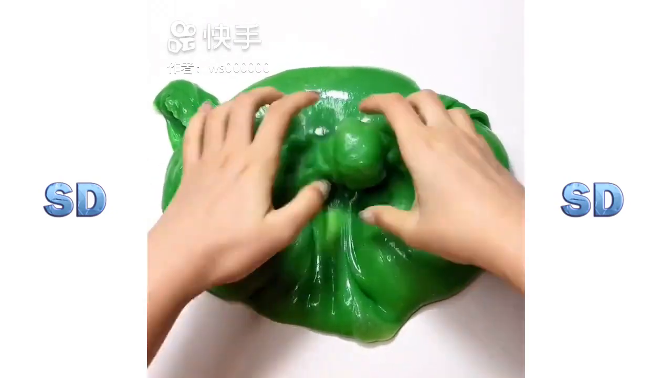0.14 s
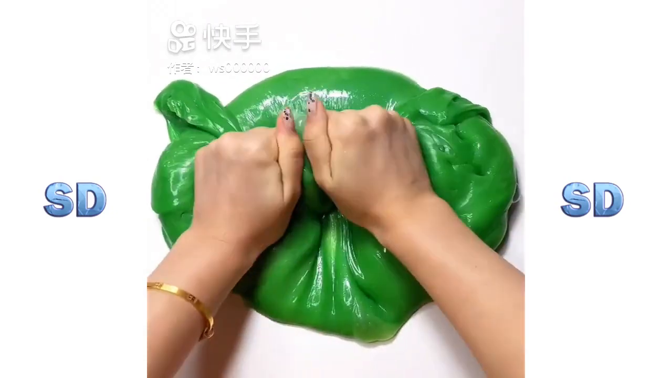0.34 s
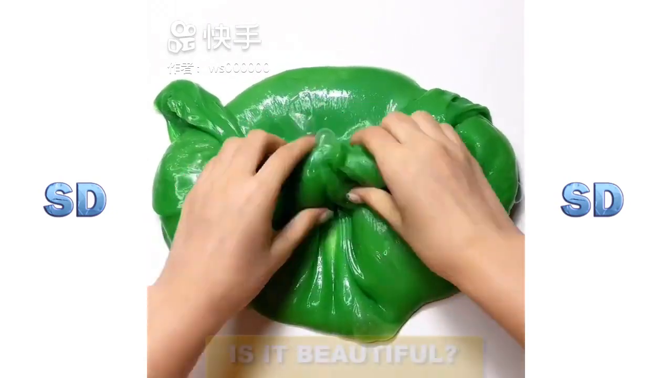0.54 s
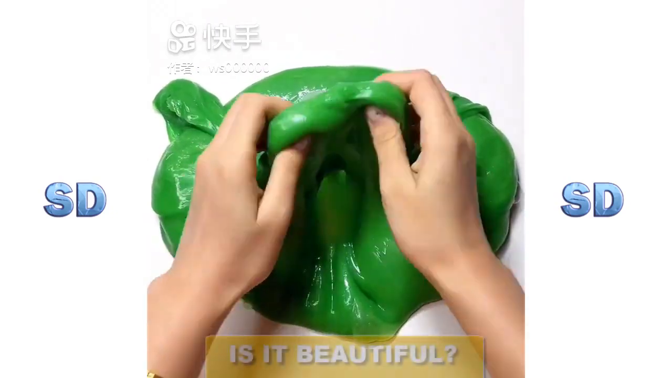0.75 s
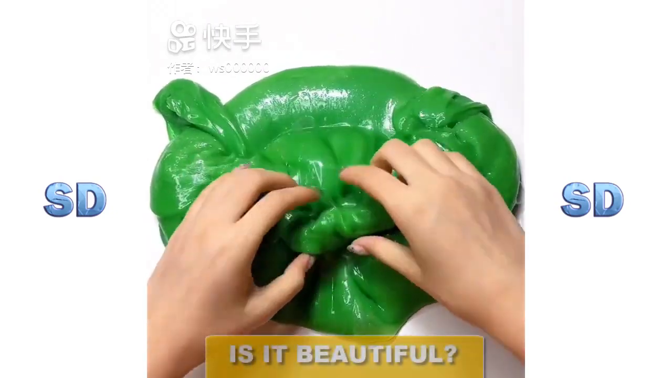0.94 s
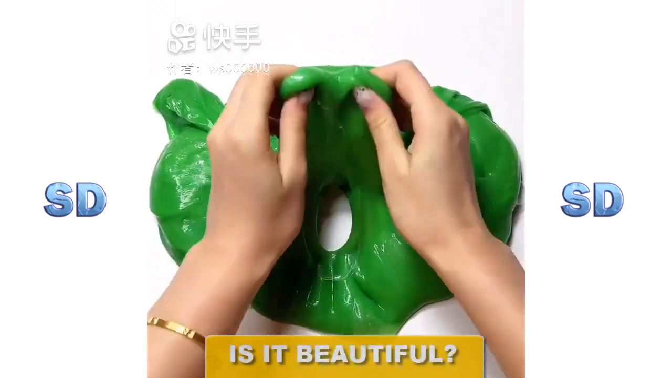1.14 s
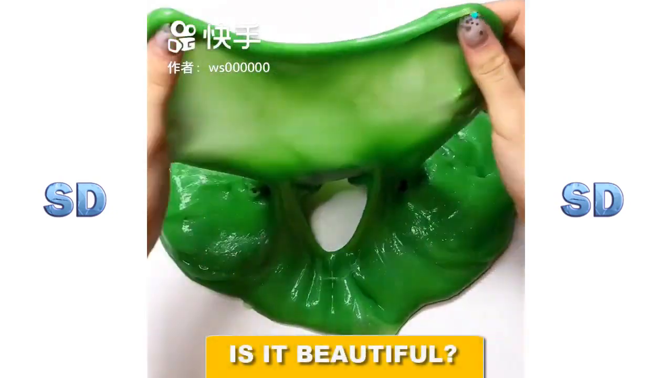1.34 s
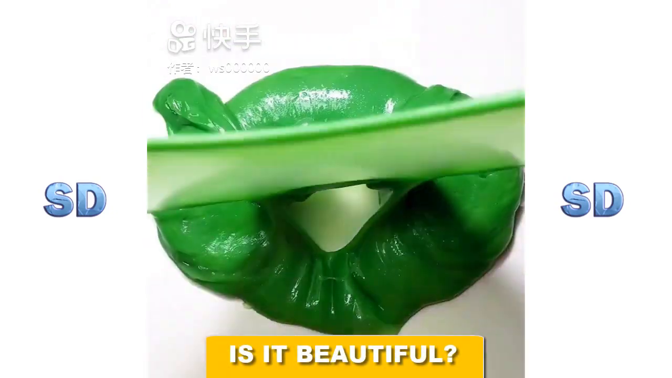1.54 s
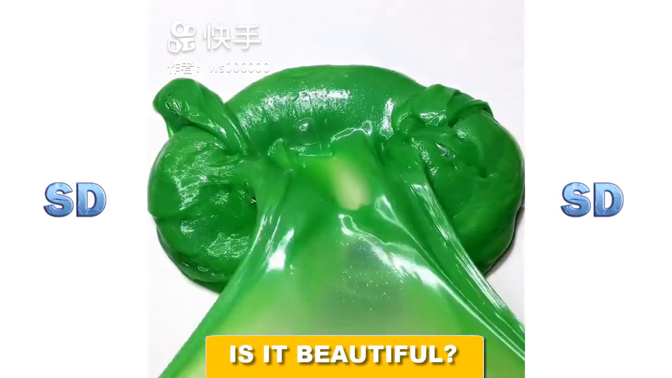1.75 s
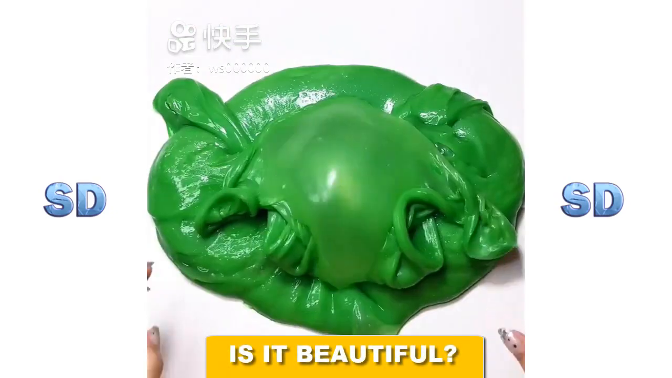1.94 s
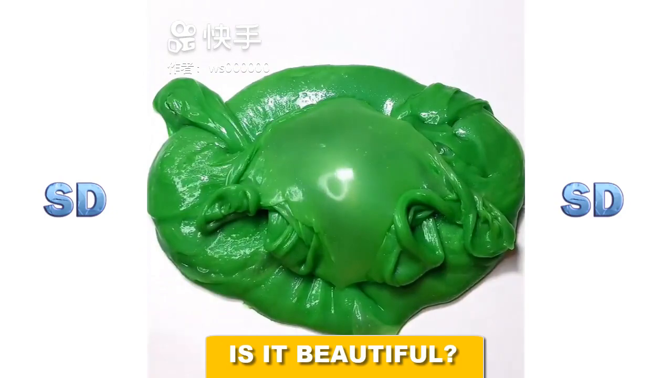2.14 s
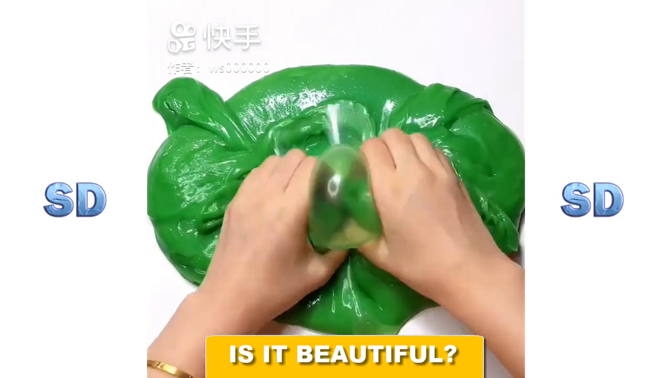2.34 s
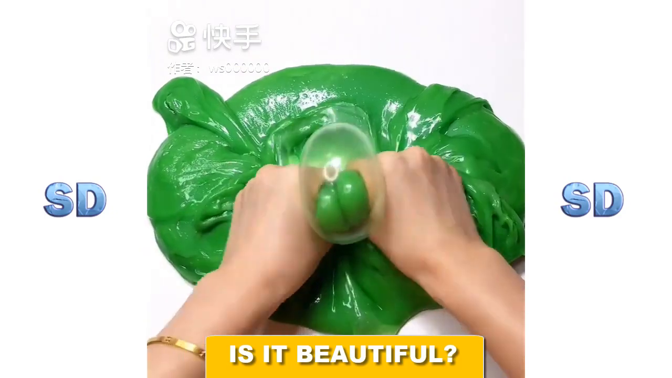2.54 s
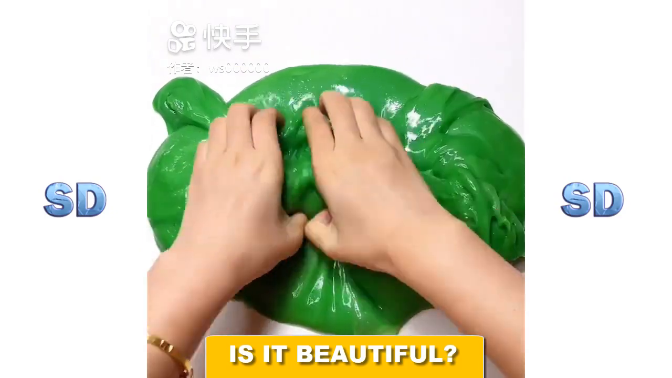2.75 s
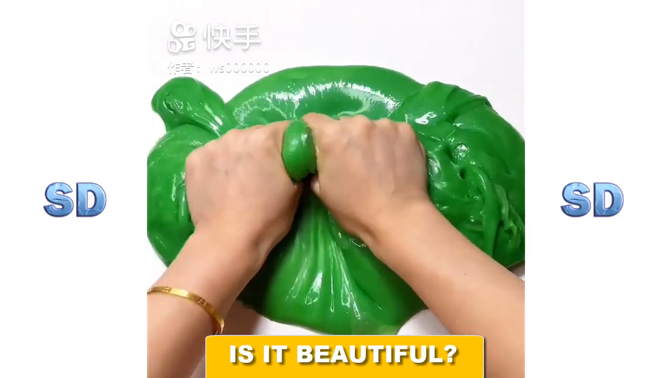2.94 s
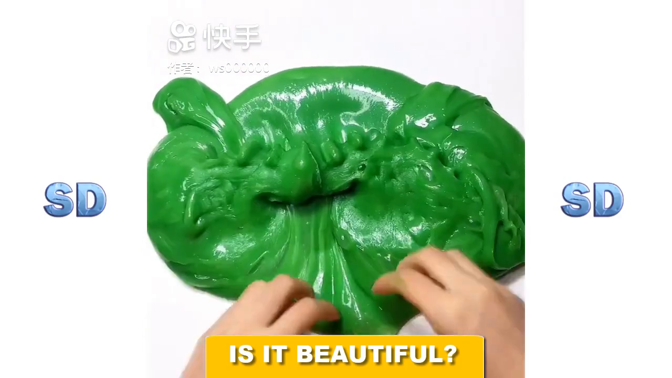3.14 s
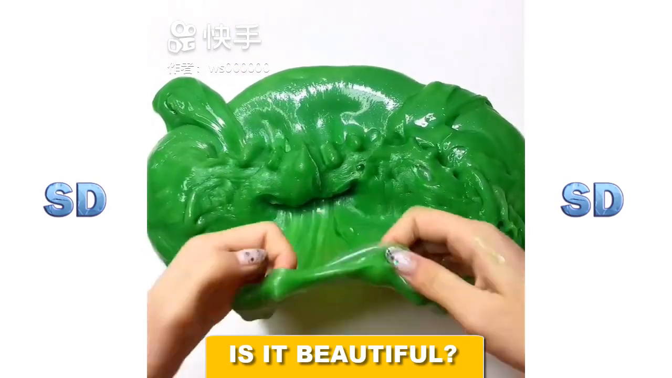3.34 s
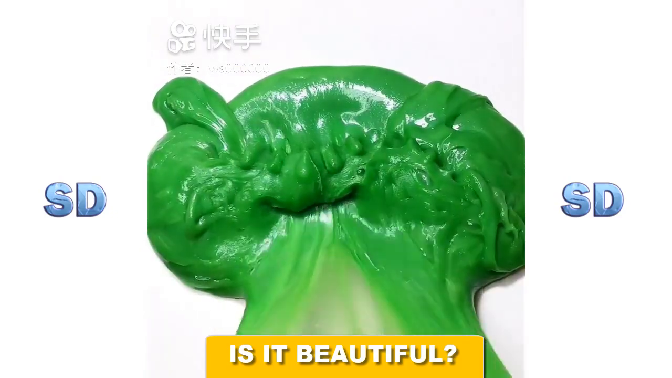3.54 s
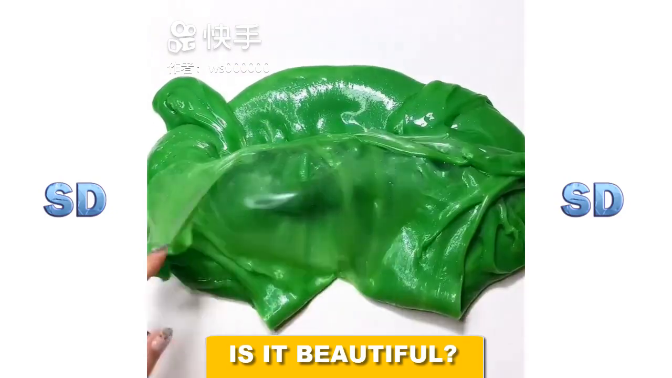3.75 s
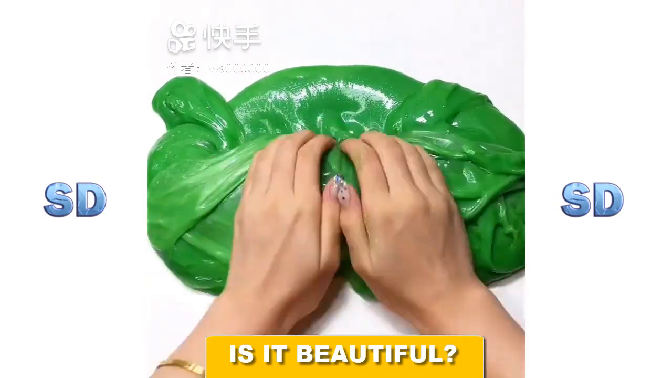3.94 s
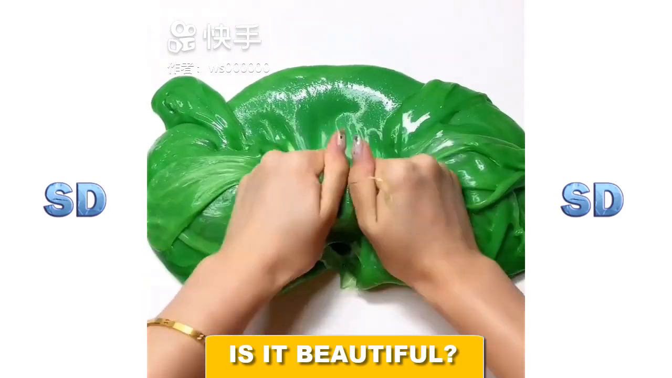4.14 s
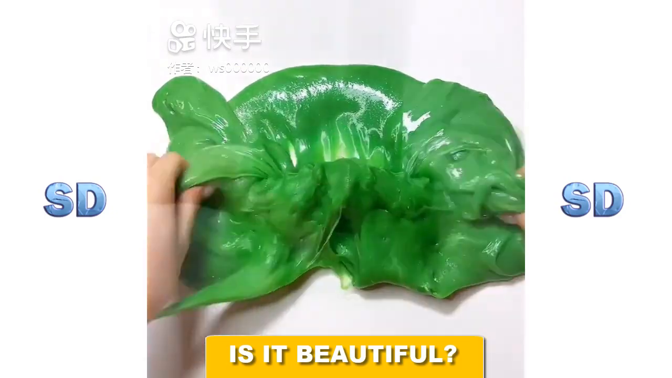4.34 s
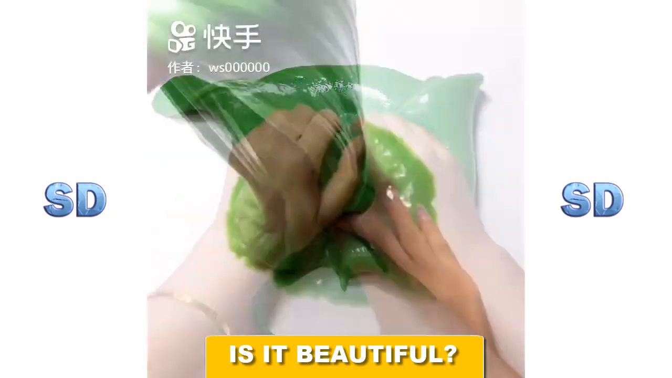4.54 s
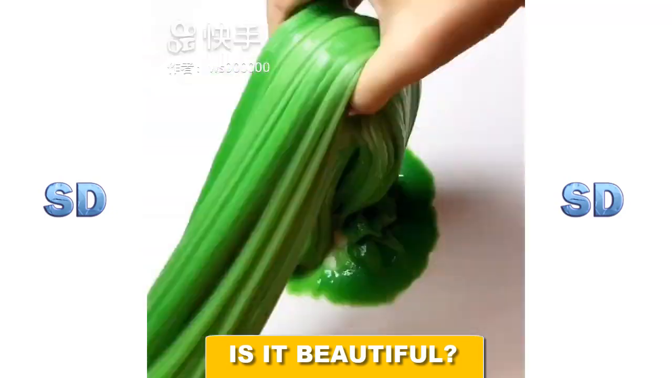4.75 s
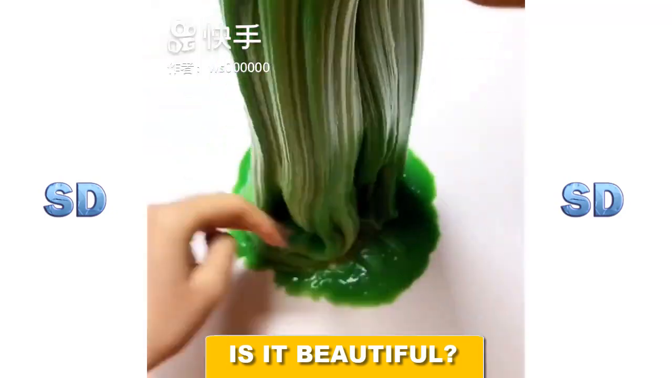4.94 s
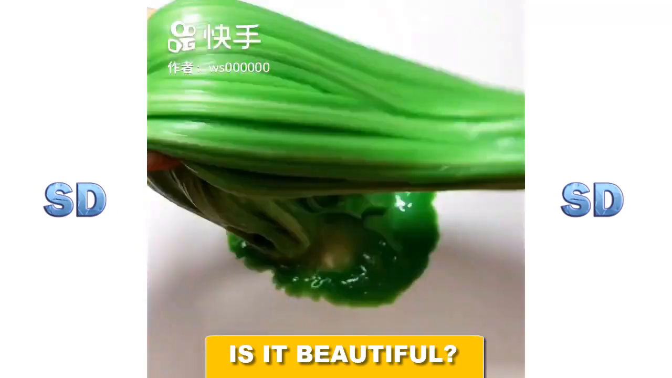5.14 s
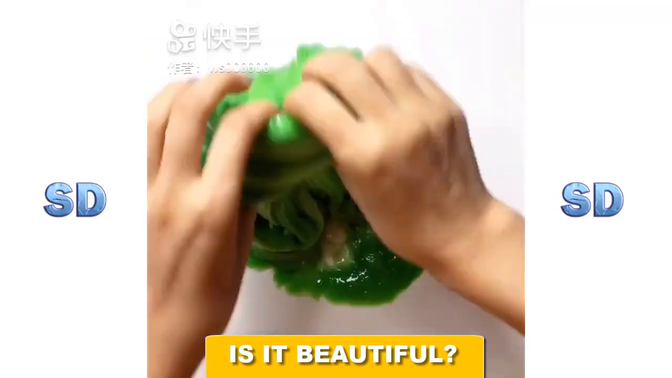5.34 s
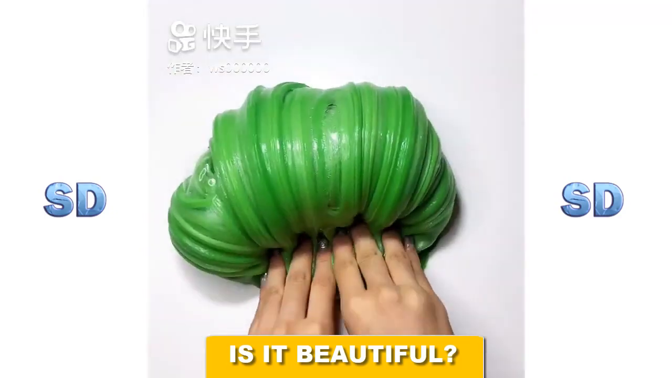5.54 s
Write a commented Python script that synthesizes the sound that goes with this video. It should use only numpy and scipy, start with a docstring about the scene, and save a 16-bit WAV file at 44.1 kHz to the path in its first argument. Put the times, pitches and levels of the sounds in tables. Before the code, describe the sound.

Hands knead sticky slime close up: wet pops, clicks and bubbly squelches in uneven bursts, with soft thuds and quiet gaps between squeezes.

```python
"""A soft thud and a faint press of air open the sound, and short wet pops run all through.
Two hands knead, fold and stretch sticky slime on a table in a small room; later it crossfades to a second scene.
Each pop is an air pocket whose skin snaps open while the air rings; threads of slime tick as they peel off the skin.
Each press drives air out through a swarm of tiny ringing bubbles, and some air squeaks through narrow channels.
Palms and falling folds thud softly over faint room tone; the loudest pops overload the close microphone."""
import sys
import numpy as np
from scipy import signal
from scipy.fft import rfft, irfft
from scipy.io import wavfile
from scipy.ndimage import uniform_filter1d

SR = 44100
rng = np.random.default_rng(int(sys.argv[2]) if len(sys.argv) > 2 else 0)


def wav_record(signal):
    """Record a signal, one row per channel, as 16-bit PCM in the file named by sys.argv[1]."""
    frames = np.transpose(np.atleast_2d(signal))
    bounded = np.clip(frames, -1, 1)
    # unit amplitude maps onto the largest positive 16-bit level
    quanta = np.round(bounded * 32767).astype(np.int16)
    wavfile.write(sys.argv[1], SR, quanta)


N = 246078
TIME = np.arange(N) / SR
EDGE_HZ = 16000  # upper limit of the sound


def amp(db):
    """Turns decibels into a gain."""
    return 10 ** (np.asarray(db) / 20)


def unit(x):
    """Scales a sound to rms 1."""
    return x / np.sqrt(np.mean(x ** 2) + 1e-20)


def read(points, hz):
    """Reads a table of (frequency, value) between its points, along a log-frequency axis."""
    f, value = np.transpose(points)
    return np.interp(np.log(hz + 1), np.log(f + 1), value)


def add(mix, start_s, sound):
    """Mixes a sound in at the given time."""
    part = mix[max(round(start_s * SR), 0):][:len(sound)]
    part += sound[:len(part)]


def noise(spectrum):
    """Makes noise of rms 1 shaped by a spectrum table."""
    gain = amp(read(spectrum, np.fft.rfftfreq(N, 1 / SR)))
    return unit(irfft(rfft(rng.standard_normal(N)) * gain, N))


def fade(t, t60_s):
    """Dies away by 60 dB in t60_s."""
    return np.exp(-np.log(1000) * t / t60_s)


def highpass(x, hz, order):
    """Removes the bass below hz."""
    return signal.sosfilt(signal.butter(order, hz, "high", fs=SR, output="sos"), x)


# The sound crossfades to a second scene: from_s, to_s
SCENE_CHANGE = (4.6, 4.85)


def second_scene():
    """Goes from 0 to 1 during the crossfade to the second scene."""
    return np.interp(TIME, SCENE_CHANGE, (0, 1))


# Spectrum of the room tone of the first scene: frequency_hz, relative_level_db (per Hz)
EARLY_TONE = [(25, -30.5), (60, -32), (105, -7.5), (150, -4.5), (260, -6), (550, -6), (800, -9),
              (1600, -13.5), (2600, -14.5), (4000, -20.5), (8000, -25), (16000, -28)]
# Spectrum of the room tone of the second scene: frequency_hz, relative_level_db (per Hz)
LATE_TONE = [(30, -40), (130, -20), (220, -0.5), (350, 2.5), (440, -4), (520, 8), (600, -1.5), (1000, 1),
             (1350, -1), (2200, -3.5), (6000, -11), (10000, -15), (16000, -15)]
# Faint hum tones of the second scene: frequency_hz, level_db (rms)
LATE_HUM = [(282, -64), (332, -64.5), (1296, -68)]


def hush(early_db=-56, late_db=-53.5, waver_rad=0.23):
    """Faint room tone from shaped noise; near the end it loses its bass and slightly wavering tones join it."""
    late = second_scene()
    drift = [(1, -3), (5, -8), (20, -40), (200, -120)]  # mostly slow wavering: (Hz, dB)
    hum = np.zeros(N)
    for hz, level_db in LATE_HUM:
        phase = 2 * np.pi * hz * TIME + waver_rad * noise(drift)
        hum += amp(level_db) * np.sqrt(2) * np.sin(phase)
    early_tone = amp(early_db) * noise(EARLY_TONE)
    late_tone = amp(late_db) * noise(LATE_TONE) + hum
    return np.sqrt(1 - late) * early_tone + np.sqrt(late) * late_tone


# Overall shape of the reflections: frequency_hz, relative_level_db
ROOM_COLOUR = [(100, -27.5), (270, 23), (500, -3.5), (900, 19), (1800, 10.5), (3000, -1), (6000, 4),
               (16000, 3.5)]
# Time each band takes to fall by 60 dB: frequency_hz, t60_s
ROOM_T60 = [(200, 0.31), (1000, 0.037), (4000, 0.15), (9000, 0.1), (16000, 0.059)]
# Room resonances that stand out: frequency_hz, relative_level_db, t60_s
ROOM_MODES = [(789, -10.5, 0.36), (958, 15, 0.026), (1183, 4.5, 0.092), (1606, -1.5, .1),
              (1890, -18.5, .09), (2506, 5.5, 0.054), (3520, 7, 0.068)]


def room(x, wet_db=-11, gap_s=0.00025, modes_db=-52):
    """Dense reflections from table and walls, each band dying at its own speed, and a few modes that stand out."""
    hz, t, bands = signal.stft(rng.standard_normal(SR // 3), SR, nperseg=128)
    bands = bands * amp(read(ROOM_COLOUR, hz))[:, None] * fade(t, read(ROOM_T60, hz)[:, None])
    tail = signal.istft(bands, SR, nperseg=128)[1]
    t = TIME[:len(tail)]
    tail = tail * (1 - np.exp(-(t / gap_s) ** 2))  # reflections build up just after the direct sound
    modes = sum(amp(db) * fade(t, t60_s) * np.cos(2 * np.pi * hz * t) for hz, db, t60_s in ROOM_MODES)
    response = amp(wet_db) * tail / np.linalg.norm(tail) + amp(modes_db) * modes
    return signal.fftconvolve(x, response)[:N]


# Soft blows on the table: start_s, level_db (relative), boom_db (relative to the knock, before their balance)
THUDS = [(0.001, -33, 2), (0.079, -27, -12), (0.112, -22, -24), (0.249, -24.5, -34), (0.273, -42, 12),
         (0.431, -32, -18), (0.565, -33.5, -1.5), (0.752, -38, -7), (1.177, -34.5, -32), (1.22, -36.5, -30),
         (2, -29.5, -7.5), (2.108, -38, 2.5), (2.42, -30.5, -16), (2.453, -33.5, -22), (2.522, -29, -29),
         (2.612, -39, -21), (2.725, -24.5, -30), (2.742, -31.5, 0.5), (2.87, -34.5, -5), (2.954, -21, -9),
         (2.985, -28.5, -16), (3.018, -31, -21), (3.153, -27, -8), (3.184, -27, -7.5), (3.305, -30, -5),
         (3.34, -33, -19), (3.805, -20.5, -13), (3.836, -20, -12), (3.904, -18.5, -20), (3.944, -19.5, -30),
         (4.006, -25.5, -22), (4.088, -28, -13), (4.123, -24.5, -28), (4.168, -27, -26), (4.292, -35, -9),
         (4.335, -33.5, -4), (4.426, -21.5, -10.5), (4.666, -23.5, -10), (4.905, -36, -41),
         (5.061, -29, -39), (5.377, -33, -42)]
# Resonances of table and room: frequency_hz (before slight detuning), relative_level_db, t60_s
KNOCK = [(257, -1, 0.15), (281.6, -13.5, 0.37), (362, -46, 0.023), (399, -5.5, 0.094), (544, -4.5, 0.039)]
# Their deepest resonances: frequency_hz (before slight detuning), relative_level_db, t60_s
BOOM = [(104.5, -6.5, 0.34), (145, -5, 0.15)]
# Resonances of the second scene: frequency_hz (before slight detuning), relative_level_db, t60_s
LATE_KNOCK = [(225, -3.5, 0.18), (314, -1.5, 0.089), (532, 12, 0.046), (616, -18, 0.073)]


def thuds(knock_db=-5, boom_db=-4, slap_db=-15, slap_s=0.021, rise_s=0.0046, detune=0.0043,
          slap_growth=0.3, soft_db=-30):
    """A soft push sets the table's low modes ringing, with a dull slap of slime that grows with the force."""
    out, t = np.zeros(N), np.arange(SR // 3) / SR
    # dull slap spectrum: (Hz, dB)
    slap = noise([(40, -44.0), (150, -6.5), (280, -19.5), (500, -9), (800, -4), (1300, -15), (4000, -48)])
    push = 1 - np.exp(-(t / rise_s) ** 2)
    for start_s, level_db, deep_db in THUDS:
        force_db = slap_db + slap_growth * (level_db - soft_db)
        fresh_slap = np.roll(slap, rng.integers(N))[:len(t)]
        sound = amp(force_db) * np.exp(-t / slap_s) * fresh_slap
        knock = KNOCK if start_s < SCENE_CHANGE[1] else LATE_KNOCK
        for modes, modes_db in ((knock, knock_db), (BOOM, boom_db + deep_db)):
            for hz, mode_db, t60_s in modes:
                turns = hz * (1 + detune * rng.uniform(-1.27, 1)) * t + rng.random()
                sound += amp(modes_db + mode_db) * fade(t, t60_s) * np.sin(2 * np.pi * turns)
        add(out, start_s, amp(level_db) * sound * push)
    return out


# Air squeaking through a narrow channel: start_s, length_s, level_db (rms), start_pitch_hz, end_pitch_hz
SQUEAKS = [(0.368, 0.014, -54, 1830, 1850), (0.574, 0.039, -31, 3427, 2942),
           (0.797, 0.056, -52.5, 1940, 1418), (0.911, 0.027, -44.5, 1166, 1712),
           (0.938, 0.017, -56, 1614, 1560), (1.018, 0.021, -49.5, 1225, 1210),
           (1.038, 0.024, -54, 1186, 1160), (2.401, 0.03, -43, 1714, 1570), (2.437, 0.034, -60, 2010, 2250),
           (2.706, 0.036, -34, 2418, 2663), (3.932, 0.036, -39, 1728, 1540),
           (4.003, 0.032, -50, 1714, 1580), (4.081, 0.03, -40, 1970, 1760)]


def squeaks(width_hz=180):
    """Sputtering air rings a narrow channel whose pitch glides as it closes or opens."""
    out = np.zeros(N)
    ring_on = np.exp(-np.pi * width_hz / SR)  # share of the ring kept from sample to sample
    for start_s, length_s, level_db, from_hz, to_hz in SQUEAKS:
        sputter = rng.standard_normal(SR // 8) + 1j * rng.standard_normal(SR // 8)
        ring = signal.lfilter([1], [1, -ring_on], sputter)[-int(length_s * SR):]
        turn = np.exp(2j * np.pi * np.cumsum(np.geomspace(from_hz, to_hz, len(ring))) / SR)
        squeak = (ring * turn).real * signal.windows.tukey(len(ring), .5)
        add(out, start_s, amp(level_db) * unit(squeak))
    return out


# Finger presses that drive air out: full_flow_s, rise_s, hold_s, fizz_db (tiny bubbles, relative),
# squelch_db (larger bubbles, relative), squelch_pitch_hz (centre)
PRESSES = [(0.005, .01, 0.099, -49, -43.5, 3310), (0.079, 0.0066, 0.027, -20, -19, 2390),
           (0.121, 0.005, .02, -17, -17, 1455), (0.238, 0.038, 0.032, -27.5, -33, 2450),
           (0.375, 0.024, .003, -47.5, -37.5, 1920), (0.472, 0.062, 0.02, -29, -32.5, 2600),
           (0.586, 0.045, 0.018, -27, -26.5, 2880), (0.754, 0.0088, 0.058, -41.5, -38.5, 2300),
           (0.924, .02, .02, -46, -64, 1423), (1.026, 0.026, 0.013, -43.5, -52, 1227),
           (1.198, 0.096, 0.0048, -42, -54, 2230), (1.961, 0.024, 0.011, -45, -47.5, 1138),
           (2.004, 0.0089, 0.0025, -28, -25.5, 2270), (2.414, .02, .004, -45, -35, 1670),
           (2.45, 0.023, 0.047, -41, -36, 2690), (2.575, 0.0061, 0.043, -16, -34.5, 2780),
           (2.713, 0.069, 0.034, -32, -32, 2800), (2.905, 0.071, 0.022, -46.5, -55, 2700),
           (2.938, .02, .004, -37.5, -40, 2600), (2.966, 0.0074, .008, -15.5, -26, 1840),
           (2.996, .01, 0.055, -32.5, -34.5, 2750), (3.144, 0.041, 0.029, -29.5, -28.5, 3090),
           (3.302, 0.0087, .002, -34.5, -28.5, 2620), (3.416, 0.066, 0.027, -49, -47.5, 2450),
           (3.816, 0.0097, 0.0023, -28, -55, 2620), (3.84, 0.03, 0.024, -46, -25.5, 1250),
           (3.904, 0.0069, 0.062, -52, -27.5, 1510), (3.998, 0.006, 0.0043, -66, -26.5, 1640),
           (4.058, .004, 0.0032, -42.5, -43, 905), (4.137, 0.045, .004, -39, -28.5, 2500),
           (4.18, 0.02, 0.024, -12.5, -14, 2525), (4.293, 0.061, 0.053, -32, -39, 1990),
           (4.425, .007, 0.014, -41, -33.5, 1900), (4.507, 0.052, 0.057, -41.5, -43.5, 1490),
           (4.665, 0.016, .004, -36, -39, 3320), (4.718, 0.026, .004, -55, -37, 2910),
           (4.766, 0.01, .005, -29, -52.5, 2465), (4.907, 0.054, 0.0075, -43.5, -44, 2020),
           (5.062, 0.003, 0.0019, -35.5, -29, 2510), (5.331, .04, .005, -56, -39, 1474),
           (5.376, 0.006, 0.0016, -41.5, -32, 2300), (5.508, 0.12, 0.024, -50.5, -40, 1400)]


def airflow(step=32, swell_db=26, sag_db_per_s=65, fall_db_per_s=700, relax_db=-24.5, relax_db_per_s=156):
    """Each press swells, sags while held and collapses; the slime keeps seeping faintly as it relaxes.

    Returns fizz dB, squelch dB and the squelch pitch, averaged by the strength of the presses, over time."""
    full_s, rise_s, hold_s, fizz_db, squelch_db, hz = np.transpose(PRESSES)[:, :, None]
    clock = TIME[::step]
    t = clock - full_s
    after = np.maximum(t - hold_s, 0)
    swell = swell_db * np.minimum(t / rise_s, 0)
    sag = sag_db_per_s * np.clip(t, 0, hold_s)
    release = np.maximum(-fall_db_per_s * after, relax_db - relax_db_per_s * after)
    shape = np.maximum(swell - sag + release, -120)
    fizz, squelch = amp(fizz_db + shape) ** 2, amp(squelch_db + shape) ** 2
    pitch = (hz * squelch).sum(0) / squelch.sum(0)
    curves = 10 * np.log10(fizz.sum(0)), 10 * np.log10(squelch.sum(0)), pitch
    return [np.interp(TIME, clock, curve) for curve in curves]


def swarm(level_db, pitch_hz, per_s, cycles, size_db, crowd_s, sag=0.014, size=256):
    """Tiny bubbles burst at random; each rings a few sinking cycles from the pitch that holds at its moment."""
    at = np.flatnonzero(rng.random(N) < per_s / SR)
    hz = np.clip(pitch_hz[at], 200, SR / 2.2)[:, None]
    age = hz * np.arange(size) / SR / cycles  # in decay times
    turns = cycles * np.log1p(sag * age) / sag * (1 + sag / 2)
    strength = amp(size_db * np.minimum(rng.exponential(1, N)[at], 4)) * rng.choice([-1, 1], N)[at]
    rings = strength[:, None] * np.sqrt(hz) * np.exp(-age) * np.sin(2 * np.pi * turns)
    places = at[:, None] + np.arange(size)
    x = unit(np.bincount(places.ravel(), rings.ravel(), N + size)[:N])
    # evens out the local loudness so that it follows the given level
    window = signal.windows.hann(int(crowd_s * SR) + 3)
    power = signal.oaconvolve(x ** 2, window / window.sum(), "same")
    return amp(level_db) * x / np.sqrt(abs(power) + 0.043)


# How common each fizz pitch is among the bubbles: pitch_hz, relative_share_db
FIZZ = [(2500, -5), (4000, -7), (5500, 1.5), (7000, -0.5), (9000, 0.5), (12000, -0.5), (14000, 5.5),
        (16000, 1.5)]


def squeezes(fizz_db=-1, crackle_db=-7.5, squelch_db=-6.0, gurgle_db=-7,
             crackle_hz=5500, squelch_spread=0.466, gurgle_spread=0.091):
    """Escaping air: fine fizz, separate crackles, a wide squelch, and uneven gurgles near the squelch pitch."""
    fizz, squelch, hz = airflow()
    grid_hz = np.arange(FIZZ[0][0], EDGE_HZ, 20)
    share = amp(read(FIZZ, grid_hz)) ** 2
    fizz_hz = np.interp(rng.random(N), np.cumsum(share) / share.sum(), grid_hz)
    fine = swarm(fizz + fizz_db, fizz_hz, per_s=5000, cycles=3.2, size_db=2.5, crowd_s=0.053, size=192)
    crackle_pitch = crackle_hz * np.exp(.5 * rng.standard_normal(N))
    crackle = swarm(fizz + crackle_db, crackle_pitch, per_s=240, cycles=2.1, size_db=5.5, crowd_s=0.08)
    wide_hz = 0.985 * hz * np.exp(squelch_spread * rng.standard_normal(N))
    wide = swarm(squelch + squelch_db, wide_hz, per_s=900, cycles=2.68, size_db=2.0, crowd_s=0.027,
                 sag=0.47, size=512)
    gurgle_hz = hz * np.exp(gurgle_spread * rng.standard_normal(N))
    gurgle = swarm(squelch + gurgle_db, gurgle_hz, per_s=440, cycles=1.8, size_db=16.5, crowd_s=0.0027, size=512)
    return fine + crackle + wide + gurgle


# Slime clinging to the skin and peeling off: from_s, to_s, tick_level_db (before random strength)
PEELS = [(0.0, 0.62, -39), (2.4, 3.46, -39), (3.795, 4.61, -35), (4.66, 5.575, -45)]


def peeling(per_s=30, tick_hz=6000, spread=0.6, decay_s=0.00037, size_db=4, grit=0.74, size=256):
    """Thin threads of slime let go of the skin at random, each with a tiny gritty tick."""
    out, t = np.zeros(N), np.arange(size) / SR
    chance, strength = rng.random(N), rng.exponential(1, N)
    pitch, rasp = rng.standard_normal(N), rng.standard_normal(N + size)
    for from_s, to_s, level_db in PEELS:
        peels_now = (chance < per_s / SR) & (TIME > from_s) & (TIME < to_s)
        for at in np.flatnonzero(peels_now):
            hz = min(tick_hz * np.exp(spread * pitch[at]), EDGE_HZ)
            tick = np.exp(-t / decay_s) * (np.sin(2 * np.pi * hz * t) + grit * rasp[at:at + size])
            add(out, at / SR, amp(level_db + size_db * min(strength[at], 2)) * tick)
    return out


# The larger air pockets that burst: start_s, ring_db (relative), pitch_hz (before it sinks and flutters),
# ring_decay_s, snap_db (of the tearing skin, relative)
POPS = [(0.0444, -4, 6010, 0.00095, -1), (0.0736, -13, 3800, 0.00089, -15), (0.079, -8, 9370, 0.0021, -13),
        (0.0973, -3, 4590, 0.0023, -2), (0.1124, -2.5, 1496, 0.0022, -2.5), (0.1172, -3, 997, 0.0024, -17),
        (0.1434, -10.5, 9800, 0.0014, -16), (0.2027, -26, 9100, .0007, -35),
        (0.4077, -17, 9300, 0.0013, -21), (0.4275, -6, 9120, 0.0018, -5.5), (0.4358, -13, 9200, .0009, -32),
        (0.4473, -17, 9040, 0.0014, -9), (0.4561, -8.5, 13700, .0009, -32), (0.4837, -15, 8650, .0012, -18),
        (0.5779, -4, 4950, 0.00084, -20), (0.7595, -20.5, 4900, 0.00081, -22.5),
        (1.1771, -11, 9130, 0.00023, -14), (1.612, -35, 10650, 0.00027, -48),
        (2.0009, -14.5, 8300, 0.00082, -16), (2.4839, -22.5, 5300, 0.0011, -24),
        (2.5238, -18, 956, 0.0024, -25), (2.5407, -23, 5740, 0.00098, -19),
        (2.5551, -8, 5340, 0.00056, -4.5), (2.5779, 1, 9660, 0.0015, -6), (2.7175, -23, 2710, .0015, -25),
        (2.7388, -23, 2630, 0.0027, -22), (2.9405, -26, 8350, .001, -14.5), (2.953, -8.5, 1630, .0012, -24),
        (2.9619, -5.5, 8550, 0.0014, -11), (2.9706, -3, 8850, 0.00033, -1), (2.9921, -9, 9600, 0.001, -5.5),
        (3.0034, -7, 9100, 0.00046, -11.5), (3.0337, -15, 5800, 0.00057, -20),
        (3.0481, -20, 4830, 0.00077, -19.5), (3.0644, -13.5, 10300, 0.00035, -19),
        (3.3039, -19, 2580, 0.00049, -15.5), (3.4821, -19, 13300, 0.00052, -34),
        (3.808, -16.5, 1240, 0.0013, -21), (3.8178, -15, 8780, 0.0021, -20),
        (3.8375, -14, 1540, 0.0026, -9.5), (3.9041, -22.5, 2400, 0.0013, -12.5),
        (3.9198, -11.5, 3800, 0.00085, -14), (3.9343, -19.5, 3900, 0.0016, -19),
        (3.9963, -42, 1660, 0.0047, -30), (4.08, -23.5, 1780, 0.0016, -20.5),
        (4.0939, -9.5, 9800, 0.00065, -25), (4.103, -20.5, 1470, 0.0018, -20),
        (4.1248, -10, 760, 0.00079, -16.5), (4.1318, -8.5, 2280, 0.00078, -20),
        (4.165, -2.5, 3265, .0024, -2), (4.1748, -7.5, 8440, 0.0033, -8), (4.2877, -21, 2260, 0.002, -21.5),
        (4.3101, -15, 3060, 0.0008, -9), (4.4269, -18, 680, 0.00064, -12.5),
        (4.4477, -18.5, 8750, 0.00096, -27), (4.6576, -12, 2960, 0.00051, -12),
        (4.6649, -11, 2480, 0.0026, -9), (4.6921, -11, 7370, 0.0011, -17),
        (4.7131, -22, 3140, 0.00068, -12.5), (4.739, -13.5, 10850, 0.00065, -27),
        (4.7648, 0.5, 9100, 0.00023, -24), (4.8031, -13, 9100, 0.00026, -24),
        (4.9081, -22.5, 1910, 0.0017, -31), (5.0725, -18, 2390, 0.001, -29),
        (5.2729, -35, 1460, 0.0014, -32.5), (5.3235, -34.5, 1480, 0.0019, -48),
        (5.3439, -21.5, 12300, 0.00071, -31), (5.4923, -26, 1410, 0.00063, -43),
        (5.5594, -13.5, 3450, 0.00058, -13)]
# Spectrum of the tearing skin: frequency_hz, relative_level_db
SNAP = [(100, -40), (300, -19.5), (700, 9), (1500, -1.5), (4000, 8), (8000, 2.5), (12000, -4.5),
        (16000, -9)]


def pops(ring_db=1, snap_db=-1.5, sag=0.21, sag_decays=1.97, middle_hz=2000, flutter=0.1,
         snap_share=0.93, size=900):
    """The skin tears with a snap; the pocket rings while its wet rim flutters, and large pockets sink most in pitch."""
    out, t, tear = np.zeros(N), np.arange(size) / SR, noise(SNAP)
    for k, (start_s, level_db, hz, decay_s, tear_db) in enumerate(POPS):
        decay_s = max(decay_s, 1 / SR)
        rim = unit(uniform_filter1d(rng.standard_normal(size), size=max(int(2 * SR / hz), 2)))
        pocket_sag = sag * (middle_hz / hz) ** .35  # low pitch means a large pocket
        glide = np.exp(pocket_sag * (3 * np.exp(-t / decay_s / sag_decays) - 2))
        turns = np.cumsum(hz * glide * (1 + flutter * rim)) / SR
        ring = np.exp(-t / decay_s) * np.sin(2 * np.pi * turns) * (1 - np.exp(-turns / 0.1))
        snap = np.exp(-t / (decay_s * snap_share)) * tear[k * size:][:size]
        pop = amp(level_db + ring_db) * ring + amp(tear_db + snap_db) * snap
        add(out, start_s, pop * (1 - np.exp(-t / .00008)))
    return out


def scene():
    """Pops, ticks, squeezes and squeaks in the room, over thuds and room tone."""
    bursts = pops() + peeling()
    air = squeezes() + squeaks()
    reflections = room(bursts + amp(-4.0) * air)
    return (bursts + air + reflections + thuds() + hush())[None]


def record(dry, ceiling=0.34, bass_hz=60, late_bass_hz=170):
    """The microphone drops the bass, more so near the end, and flattens the loudest peaks; then the treble is cut."""
    late = second_scene() ** 2
    thin = highpass(dry, bass_hz, order=2) * (1 - late) + highpass(dry, late_bass_hz, order=2) * late
    squashed = thin / (1 + abs(thin / ceiling) ** 6) ** (1 / 6)
    lowpass = signal.firwin(255, EDGE_HZ, window=("kaiser", 8), fs=SR)
    return signal.oaconvolve(squashed, lowpass[None], "same")


dry = scene()
out = record(dry)
wav_record(out)
```